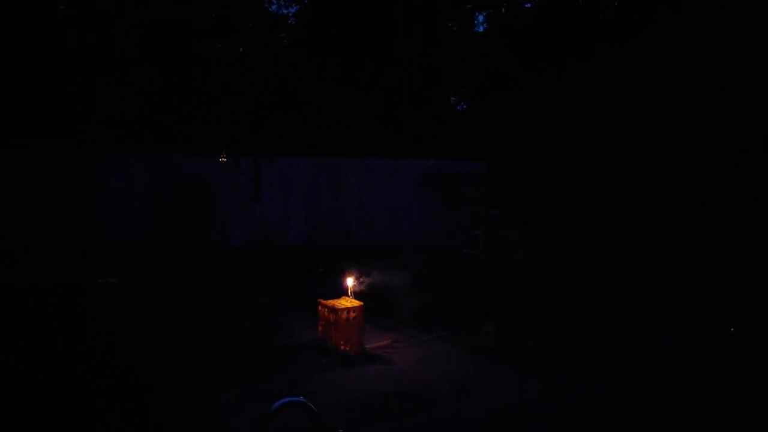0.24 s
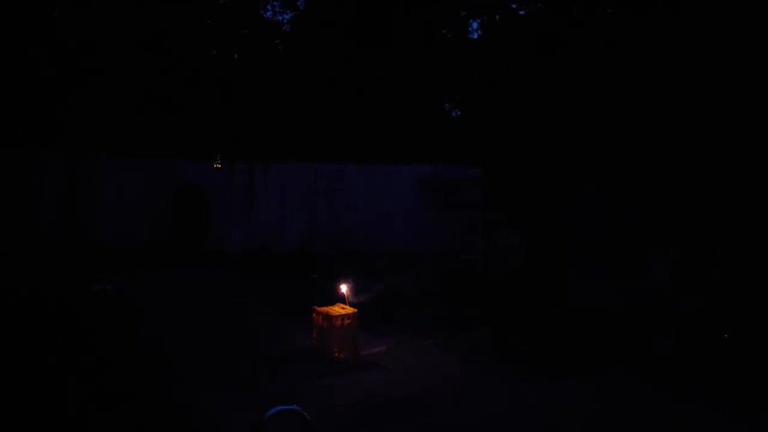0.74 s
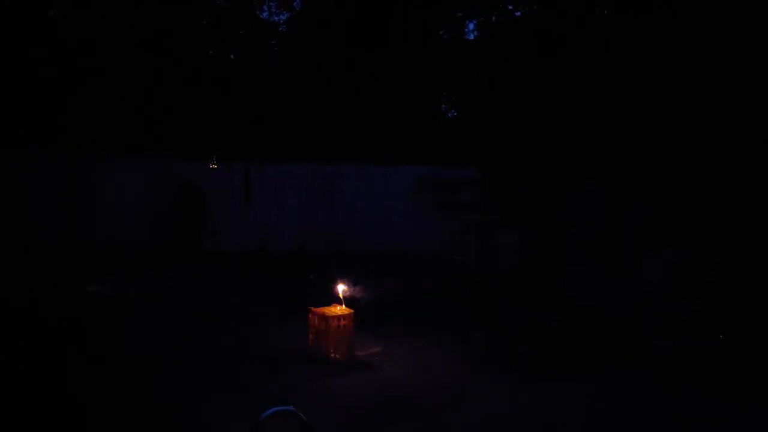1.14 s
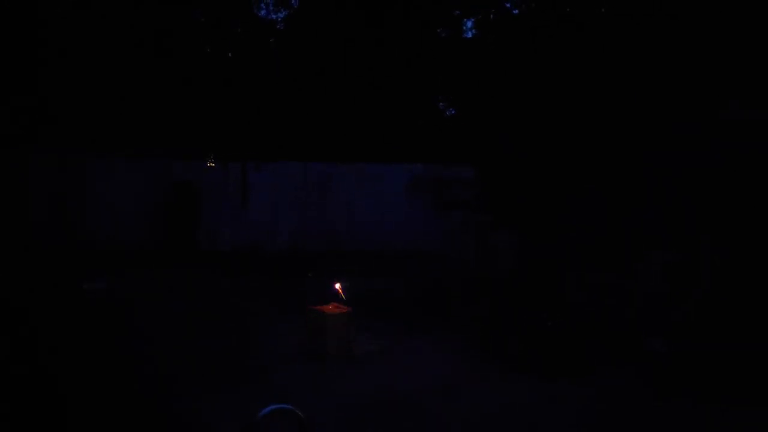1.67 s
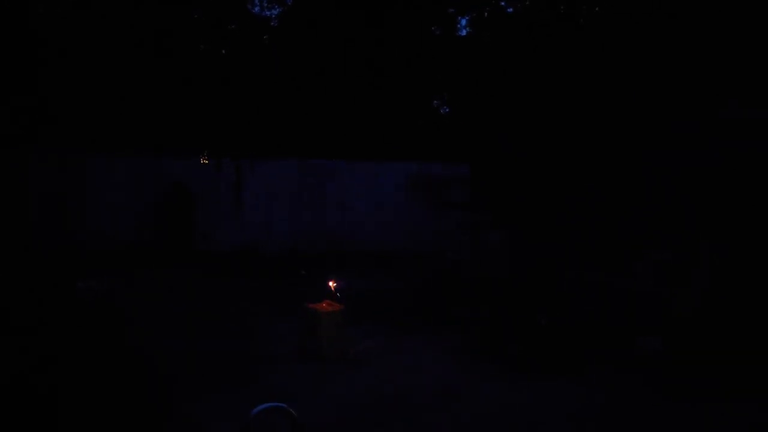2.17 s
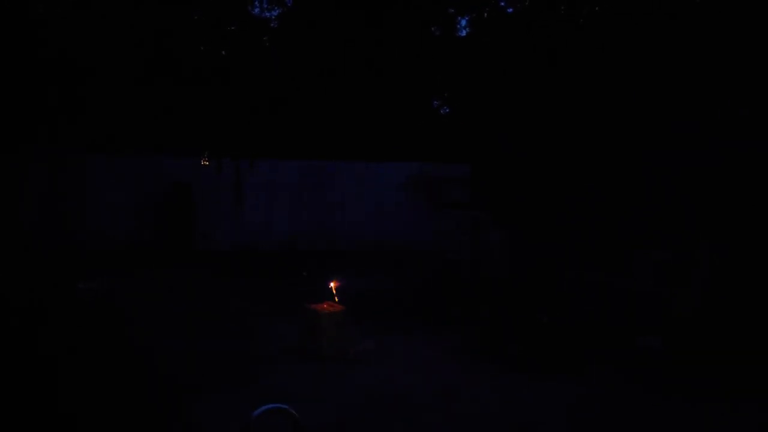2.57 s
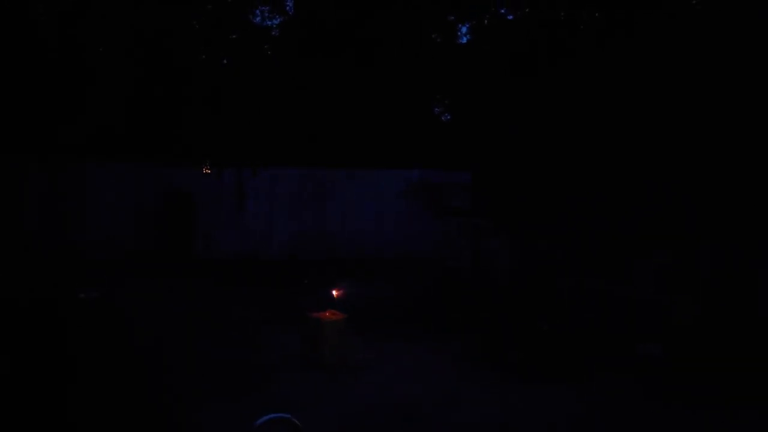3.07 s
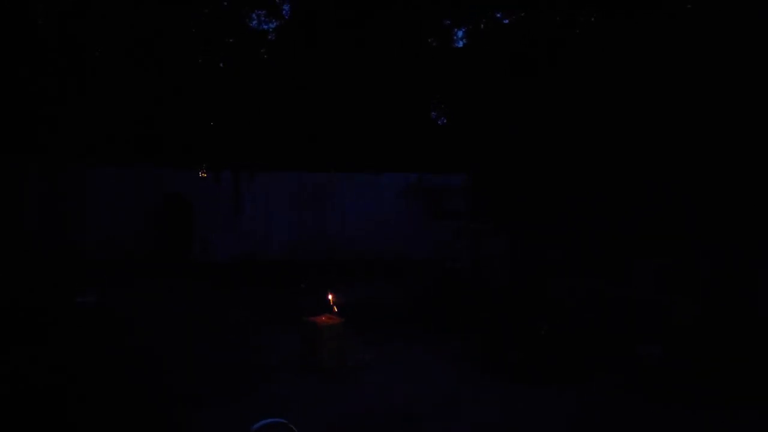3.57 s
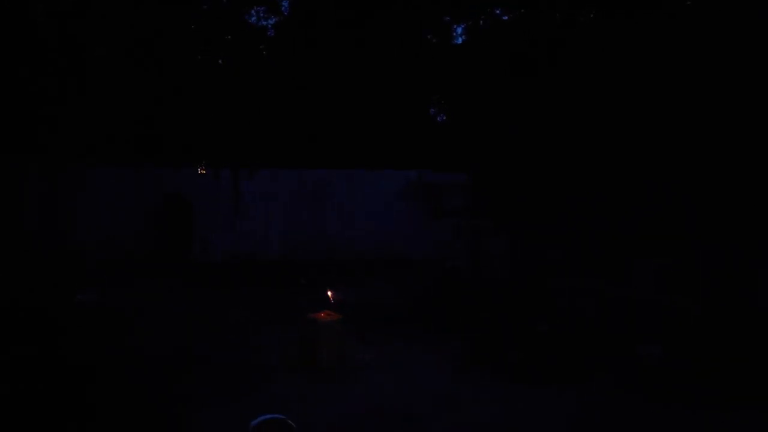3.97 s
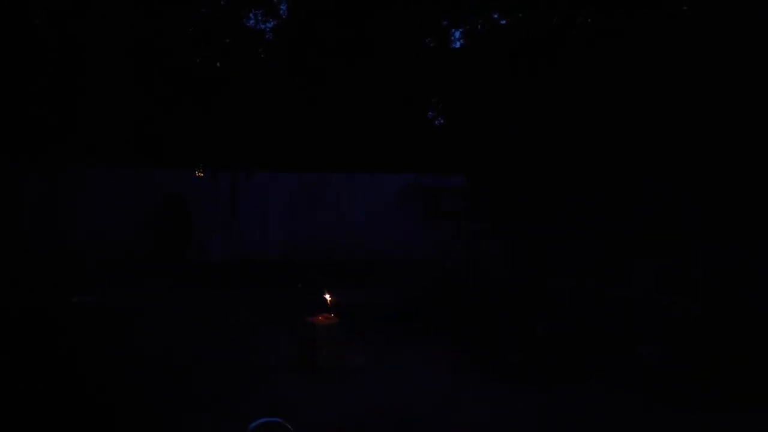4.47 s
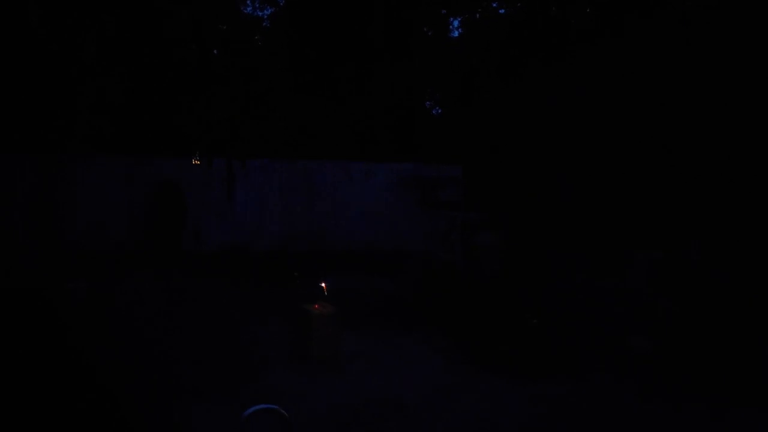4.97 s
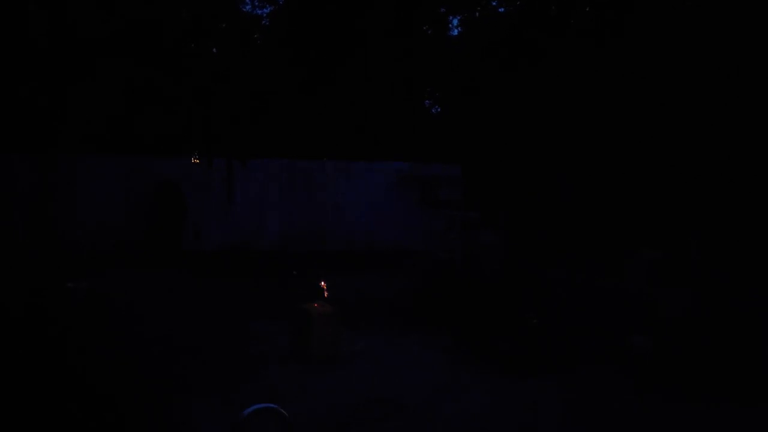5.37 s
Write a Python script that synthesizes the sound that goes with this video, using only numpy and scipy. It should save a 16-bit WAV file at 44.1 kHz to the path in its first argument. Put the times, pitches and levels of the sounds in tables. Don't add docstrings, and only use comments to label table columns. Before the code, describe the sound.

Distant fireworks thud and crack constantly across a dark neighbourhood while a nearby fuse fizzes faintly, flaring into a brighter hiss at the end.

```python
import sys
import numpy as np
from scipy import signal
from scipy.fft import rfft, irfft, next_fast_len
from scipy.io import wavfile

SR = 44100
rng = np.random.default_rng(int(sys.argv[2]) if len(sys.argv) > 2 else 0)


def volts_from_decibels(level):
    exponent = np.asarray(level, float) / 20
    return 10 ** exponent


def log_audio(samples):
    frames = np.atleast_2d(samples).T
    limited = np.clip(frames, -1, 1)
    pcm = np.round(limited * 32767).astype(np.int16)
    wavfile.write(sys.argv[1], SR, pcm)


N = 247842
SIZE = next_fast_len(N)
HZ = np.maximum(np.arange(SIZE // 2 + 1) * SR / SIZE, 1)


def rms_one(x):
    return x / np.sqrt(np.mean(x ** 2) + 1e-20)


def in_time(rows):
    start_s, *columns = np.transpose(rows)
    return [np.interp(np.arange(N) / SR, start_s, column) for column in columns]


def at_hz(rows, hz, axis=1):
    table = np.array(rows)
    return np.interp(np.log(hz), np.log(table[:, 0]), table[:, axis])


def drift(rate_hz):
    hop = 40
    pole = np.exp(-2 * hop * np.pi * rate_hz / SR)
    noise = rng.standard_normal(N // hop + 2002)
    slow = signal.lfilter([1], [1, -2 * pole, pole * pole], noise)[2000:]
    return np.interp(np.arange(N) / hop, np.arange(len(slow)), rms_one(slow))


# (pitch_hz, likeness_0_to_1, left_lead_radians, left_over_right_db)
PORTS = [(25, .95, .1, -.5), (80, .96, .15, 2.5), (150, .94, .3, 0), (300, .85, .55, 1.5),
         (600, .68, .5, .5), (950, .35, 1.3, -1), (1400, .38, 3.1, -1.5), (1800, .1, 5, -1),
         (2150, .48, 6.2, -.5), (3300, .4, 6.3, -1.5), (4300, .65, 7, -2), (7000, .35, 8.6, 1.5),
         (9500, .15, 9.4, 2), (12000, .4, 9.3, 4), (15500, .5, 10.3, 5)]


def port_noise(gain):
    shared, left, right = rfft(rng.standard_normal((3, SIZE)))
    alike = np.clip(at_hz(PORTS, HZ), 0, 1)
    half_level = volts_from_decibels(at_hz(PORTS, HZ, axis=3) / 2)
    shift = half_level * np.exp(.5j * at_hz(PORTS, HZ, axis=2))
    left_port = np.sqrt(alike) * shared + np.sqrt(1 - alike) * left
    right_port = np.sqrt(alike) * shared + np.sqrt(1 - alike) * right
    return gain * np.array([shift * left_port, right_port / shift])


def to_sound(spectra):
    return irfft(spectra, SIZE)[:, :N]


def in_bands(spectra, centres):
    place = np.interp(np.log(HZ), np.log(centres), np.arange(len(centres)))
    for k, hz in enumerate(centres):
        yield hz, to_sound(spectra * np.clip(1 - abs(place - k), 0, 1))


def echo_power(start_s, level_db, t60_s, rise_s):
    grid = np.arange(0, N + 64, 64)
    since_s = np.maximum(grid / SR - start_s[:, None], 0)
    swell = 1 - np.exp(-since_s / rise_s)
    decay = volts_from_decibels(-120 * since_s / t60_s[:, None])
    tails = volts_from_decibels(2 * level_db)[:, None] * swell * decay
    return np.interp(np.arange(N), grid, tails.sum(axis=0))


# (pitch_hz, level_db_per_hz)
NIGHT = [(1410, -30), (2400, -1), (2720, -5.5), (3390, 1), (3850, -4), (4540, -2.5), (5830, -9),
         (6410, -5.5), (8180, -2), (9270, -7.5), (11100, -6), (12100, -13.5), (14100, -20.5), (15100, 0.5),
         (15700, 0.5)]
NIGHT_DB = -77.5


def night():
    return volts_from_decibels(NIGHT_DB + 4.5) * rms_one(to_sound(port_noise(volts_from_decibels(at_hz(NIGHT, HZ)))))


# (start_s, level_db, extra_deep_db)
ROLL = [(0.0, -43.5, 1.5), (0.59, -40.5, -3), (1.14, -42, -3), (1.33, -45.5, -7.5), (1.58, -46, -3),
        (2.02, -40.5, -5.5), (2.24, -43.5, -0.5), (2.52, -42, -5.5), (2.96, -41.5, -4.0),
        (3.16, -44.5, -4.0), (3.43, -43, 1), (3.79, -38.5, 0.5), (4.33, -38, -4.0), (4.66, -43, -2.5),
        (5.1, -38.5, -1), (5.62, -42.5, -5.5)]
# (pitch_hz, level_db_per_hz)
ROLL_COLOUR = [(20, -39.5), (50, -2), (85, 0), (125, 5), (170, -1), (245, -3), (330, -6.5), (520, -6.5),
               (700, -16.5), (950, -19), (1400, -24.5), (1950, -34.5), (2350, -52), (2700, -63.5),
               (3400, -100)]
ROLL_MIDDLE_DB, ROLL_BRIGHT_DB, BRIGHT_FOLLOWS = 0.5, -57.5, 0.87
SMALL_ECHO_DB, SMALL_T60_S, SMALL_RISE_S = -12.5, 0.33, 0.0018
BOOM_ECHO_DB, BOOM_T60_S, BOOM_RISE_S = -18, 0.5, 0.012
CRACK_ECHO_DB, CRACK_T60_S = -18, 0.32
HILL_ECHO_DB, HILL_T60_S = -13.5, 1.7
STREET_DB, STREET_T60_S, STREET_DB_PER_OCTAVE = -2, 0.15, 4


def roll():
    far_db, heavy_db = in_time(ROLL)
    bright_db = ROLL_BRIGHT_DB + BRIGHT_FOLLOWS * (far_db - far_db.mean())
    zone_db = far_db + heavy_db, far_db + ROLL_MIDDLE_DB, bright_db
    spectra = port_noise(volts_from_decibels(at_hz(ROLL_COLOUR, HZ)))
    power = np.mean(abs(spectra) ** 2, axis=0) * 2 / SIZE ** 2
    zones_hz = (40, 170), (170, 700), (700, 2400)
    zone_rms = [np.sqrt(power[(HZ > lo) & (HZ < hi)].sum()) for lo, hi in zones_hz]

    thud_s, thud_db, thud_hz, swings = np.transpose(THUDS + BOOMS)
    counts = [len(THUDS), len(BOOMS)]
    thud_echo_db = thud_db + np.repeat([SMALL_ECHO_DB, BOOM_ECHO_DB], counts)
    thud_t60_s = np.repeat([SMALL_T60_S, BOOM_T60_S], counts)
    thud_rise_s = np.repeat([SMALL_RISE_S, BOOM_RISE_S], counts)[:, None]

    near_s, near_db, near_hz = np.transpose([row[:3] for row in CRACKS])
    crack_rows = [(s, db + CRACK_ECHO_DB, CRACK_T60_S, tilt) for s, db, hz, tilt in CRACKS]
    snap_rows = [(s, db + echo, t60, tilt) for s, db, echo, t60, tilt in SNAPS]
    sharp_s, sharp_db, sharp_t60_s, tilt_db = np.transpose(crack_rows + snap_rows)

    out = 0
    reflections_db = np.minimum(1.14 * drift(58), 2)
    for hz, band in in_bands(spectra, np.geomspace(30, 2500, 14)):
        zone = int(hz > 170) + int(hz > 600)
        if zone < 2:
            matched_db = thud_echo_db - 2.13 * abs(np.log2(hz / thud_hz))
            tails = echo_power(thud_s + 2.5 * swings / thud_hz, matched_db, thud_t60_s, thud_rise_s)
        else:
            octaves = np.log2(hz / 1200)
            start_db = sharp_db + tilt_db * octaves
            close = echo_power(sharp_s, start_db, sharp_t60_s * 1.37 ** octaves, rise_s=.008)
            hill_t60_s = np.full(len(sharp_s), HILL_T60_S)
            tails = close + echo_power(sharp_s, start_db + HILL_ECHO_DB, hill_t60_s, rise_s=0.09)
        off_pitch_db = STREET_DB_PER_OCTAVE * abs(np.log2(2.6 * hz / near_hz))
        street_db = near_db + STREET_DB - off_pitch_db - 6 * (zone == 2)
        tails = tails + echo_power(near_s, street_db, np.full(len(near_s), STREET_T60_S), rise_s=.003)
        level = np.sqrt(volts_from_decibels(2 * zone_db[zone]) + tails)
        out = out + level / zone_rms[zone] * volts_from_decibels(reflections_db + 1.47 * drift(4.45)) * band
    return out


# (start_s, casing_sputter_db, jet_flow_db)
FUSE = [(0.02, -103, -88.5), (0.4, -110, -79), (0.68, -104, -86), (0.76, -80, -80), (0.99, -89, -82),
        (1.07, -74.5, -79), (1.25, -74.5, -80.5), (1.31, -86, -83.5), (1.56, -98, -79), (2.02, -76.5, -82),
        (2.1, -87, -83.5), (2.32, -83, -81.5), (2.47, -68.5, -77), (2.67, -78, -75), (2.87, -94.5, -76.5),
        (3.7, -88, -75.5), (4.7, -82, -84.5), (5.15, -78, -76)]
# (start_s, added_sputter_db, added_jet_db)
FLARE = [
    (5.15, -1.2, .1),
    (5.25, 2, 0),
    (5.32, 14, 6),
    (5.41, 16, 7.5),
    (5.46, 19.5, 12.5),
    (5.56, 18, 14.5),
    (5.59, 21, 16),
    (5.62, 21, 22),
]
# (pitch_hz, width_hz, level_db)
FIZZ_MODES = [
    [(4170, 480, -1), (4520, 480, 0)],
    [(2950, 350, -5), (3330, 560, 0)],
    [(5200, 620, 0)],
]
# (pitch_hz, level_db_per_hz)
HISS_COLOUR = [(3240, -35), (5500, -10.5), (6030, -5.5), (7510, -4.5), (7920, -7), (8570, -5.5),
               (9480, -11.5), (11300, -3.5), (12200, -7.5), (13800, -3.5), (14600, -4), (15200, 1.5),
               (15700, 2)]
HOLLOW_FOLLOWS, HOLLOW_DB = (0.89, 0.9, 0.7), (-80.5, -86, -89.5)
HOLLOW_FLARE, HOLLOW_JET = (0.89, .1, .2), (.05, 1.09, 0.95)
UPPER_OPENS_S, UPPER_OPEN_DB = 3.6, -83.5
JET_BRIGHTENS = .12


def fuse():
    t = np.arange(N) / SR
    burn_db, hiss_db = in_time(FUSE)
    flare_db, jet_db = in_time(FLARE)
    fizz_db = [db + share * (burn_db + 80) + flare * flare_db + jet * jet_db
               for share, db, flare, jet in zip(HOLLOW_FOLLOWS, HOLLOW_DB, HOLLOW_FLARE, HOLLOW_JET)]
    fizz_db[2] = np.maximum(fizz_db[2], UPPER_OPEN_DB + 25 * np.minimum(t - UPPER_OPENS_S, 0))
    sputter_db = 1.3 * drift(40) + 1.7 * drift(9)
    fizz = 0
    for modes, level_db in zip(FIZZ_MODES, fizz_db):
        hollow = sum(volts_from_decibels(db) / (1 + (2 * (HZ - hz) / width) ** 2) ** 2 for hz, width, db in modes)
        noise = rms_one(to_sound(port_noise(hollow)))
        fizz = fizz + noise * volts_from_decibels(level_db - 1.0 + sputter_db + 1.1 * drift(90))

    jet_colour = volts_from_decibels(at_hz(HISS_COLOUR, HZ)) / (1 + (5600 / HZ) ** 20)
    slices = in_bands(port_noise(jet_colour), np.geomspace(5500, 15500, 6))
    hiss = rms_one(sum(band * volts_from_decibels(0.77 * drift(1.0) + 1.2 * drift(60)) for hz, band in slices))
    treble = signal.sosfilt(signal.butter(2, 12000, "high", fs=SR, output="sos"), hiss)
    hiss = hiss + treble * (volts_from_decibels(JET_BRIGHTENS * jet_db) - 1)
    return fizz + hiss * volts_from_decibels(hiss_db + jet_db + 9.0 + .1 * sputter_db)


def blast(peak_db, start_s, hz, swings, glide, pan_db, lead_s):
    first = max(round((start_s - 3 * swings / hz) * SR), 0)
    near = slice(first, round((start_s + 8 * swings / hz) * SR))
    t = (np.arange(N) / SR)[near]
    wave = np.zeros((2, len(t)))
    for side in (0, 1):
        cycles = (t - start_s - side * lead_s) * hz
        rise = (np.minimum(cycles, 0) / (.8 * swings)) ** 2
        fall = (np.maximum(cycles, 0) / (1.3 * swings)) ** 2
        swing = np.sin(2 * np.pi * (cycles + glide * cycles * abs(cycles)))
        wave[side] = volts_from_decibels(peak_db + pan_db / 2 - pan_db * side) * np.exp(-rise - fall) * swing
    return near, wave


# (start_s, peak_db, pitch_hz, length_swings)
THUDS = [(0.097, -26, 285, 0.16), (0.297, -26.5, 168, 0.25), (0.399, -23, 194, 0.31),
         (0.422, -27, 139, 1.2), (0.573, -29.5, 297, 1.2), (0.759, -27, 337, 1.05), (0.775, -25, 342, 0.31),
         (1.276, -25.5, 345, 0.25), (1.626, -27, 192, 0.24), (2.229, -34, 220, 1.54), (2.429, -33, 375, 3),
         (2.527, -28, 234, 0.34), (2.571, -23, 188, 0.38), (2.834, -27.5, 184, 0.61),
         (3.007, -29, 162, 0.37), (3.147, -31, 258, 0.88), (3.631, -26, 55.4, 0.62),
         (3.694, -23, 202, 0.63), (3.783, -21, 145, 0.76), (4.083, -21.5, 164, 0.26),
         (4.261, -25.5, 290, 0.57), (4.343, -24.5, 170, 0.54), (4.511, -25, 152, 0.6),
         (4.663, -26, 293, 0.35), (4.824, -26.5, 422, 1.8), (4.869, -27, 152, 0.72),
         (5.221, -20, 182, 0.32), (5.247, -29, 156, 0.32), (5.317, -23, 257, .4), (5.547, -25.5, 308, 0.37)]
# (start_s, peak_db, pitch_hz, length_swings)
BOOMS = [(.4515, -15.5, 235, 1.1), (1.0065, -19, 250, .8), (1.0208, -18.5, 240, .9),
         (1.5756, -20, 225, 1.1), (1.9812, -17, 238, 1.1), (2.3778, -18.5, 235, 1),
         (3.3612, -15.5, 125, .6), (3.3706, -20, 260, .8), (3.3855, -15.5, 98, 1.3), (3.4062, -23, 105, 1),
         (3.4218, -20.5, 170, .7), (3.6252, -12.5, 225, .95), (3.6455, -20, 240, .8),
         (3.6568, -21, 210, .9), (3.8724, -20.5, 190, .9), (4.2104, -20, 300, .7),
         (4.2147, -18.5, 420, .65), (4.2186, -17, 320, .95), (4.9772, -16, 260, .6),
         (4.9816, -16.5, 300, .8), (4.9858, -19.5, 400, 1), (5.2044, -16, 250, .95),
         (5.5794, -20, 350, 1.1)]
# (start_s, peak_db, pitch_hz, brightness_db_per_octave)
CRACKS = [(0.066, -36, 595, -7), (0.096, -29, 760, -5), (0.295, -34.5, 560, -10), (0.343, -36.5, 617, 1),
          (0.57, -41.5, 590, -13), (0.75, -36, 580, -12.5), (1.044, -45, 590, -22.5),
          (1.268, -39.5, 640, -14), (1.82, -52, 570, -9), (1.846, -38, 620, -17), (2.036, -44, 603, -19),
          (2.431, -36, 724, -4), (2.505, -38.5, 850, -12), (2.581, -38, 825, -6.5), (2.781, -31.5, 670, -4),
          (3.627, -40, 580, 0.5), (3.662, -38.5, 700, 0), (3.695, -36, 650, 0), (4.121, -59, 613, 5),
          (4.213, -26, 706, 3.5), (4.401, -39.5, 605, -1), (4.697, -39.5, 616, -11.5),
          (4.819, -28, 770, -5), (4.854, -45, 614, -12), (5.084, -39, 597, 13), (5.195, -33.5, 587, 3),
          (5.285, -38.5, 735, -13), (5.543, -40, 590, 17), (5.577, -27, 626, -10)]
# (start_s, peak_db, echo_re_peak_db, echo_t60_s, brightness_db_per_octave)
SNAPS = [(0.0827, -35.5, 1.5, 0.17, 1.8), (0.833, -27, -17.5, 0.3, 5.5), (1.294, -38, -16, 0.46, 4),
         (1.669, -52.5, -5.5, 0.39, -7), (1.943, -43, -8.5, 0.28, 6), (2.433, -36, -3.5, 0.2, 5),
         (2.8313, -27, -12, 0.12, 2.2), (3.4643, -40.5, -10, 0.53, 5.5), (3.6248, -35.5, -3.5, 0.94, 4.5),
         (3.7843, -45.5, -7, .44, 3), (4.1679, -32.5, -10.5, 0.11, -4.5), (4.212, -48, -8, 0.42, 1.1),
         (4.3036, -36.5, -8.5, 0.19, 0.5), (4.821, -43, -1.5, 0.29, 10.5), (4.9307, -41.5, -1.5, 0.57, -3),
         (4.9764, -36, -5, 0.35, .1), (5.5842, -43, -10, .38, 17)]
SNAP_HZ, SNAP_SWINGS = 1290, 0.59
AIR_CUT_HZ = 2350


def bursts():
    out = np.zeros((2, N))
    for s, db, hz, swings in THUDS + BOOMS:
        pan_db = rng.normal(.5, .8)
        near, wave = blast(db, s, hz, max(swings, .4), glide=.035, pan_db=pan_db, lead_s=.00025)
        out[:, near] += wave
    for s, db, hz, *rest in CRACKS + [(s, db, SNAP_HZ) for s, db, *rest in SNAPS]:
        swings = .9 if hz < 1000 else SNAP_SWINGS
        pan_db = rng.normal(-.5, 1.5)
        near, wave = blast(db - 1, s + .0012, hz, swings, glide=.1, pan_db=pan_db, lead_s=.0002)
        out[:, near] += wave
    return signal.sosfilt(signal.butter(6, AIR_CUT_HZ, fs=SR, output="sos"), out)


GLINT_S, GLINT_RISE_S, GLINT_T60_S, GLINT_DB = 3.64, 0.078, 0.39, -55.5
GLINT_HZ, GLINT_WIDTH_HZ = 2800, 1500
GLINT_LAG_S_PER_OCTAVE = 0.031


def glint():
    colour = 1 / (1 + (2 * (HZ - GLINT_HZ) / GLINT_WIDTH_HZ) ** 2) / (1 + (2200 / HZ) ** 8)
    level_db, t60_s = np.array([GLINT_DB + 13]), np.array([GLINT_T60_S])
    out = 0
    for hz, band in in_bands(port_noise(colour), np.geomspace(2300, 6000, 5)):
        start_s = np.array([GLINT_S + GLINT_LAG_S_PER_OCTAVE * np.log2(hz / GLINT_HZ)])
        out = out + band * np.sqrt(echo_power(start_s, level_db, t60_s, GLINT_RISE_S))
    return out


def scene():
    return night() + roll() + fuse() + bursts() + glint()


def roll_off(x):
    return signal.sosfilt(signal.butter(12, 16340, fs=SR, output="sos"), x)


def record(dry):
    top_hz = 15780
    dull = to_sound(rfft(dry, SIZE) * (HZ < top_hz))
    return roll_off(dull)


dry = scene()
out = record(dry)
log_audio(out)
```